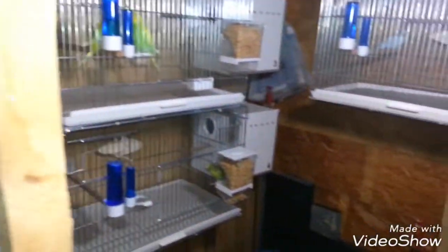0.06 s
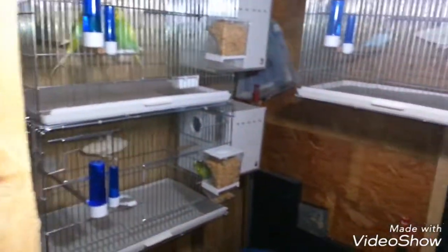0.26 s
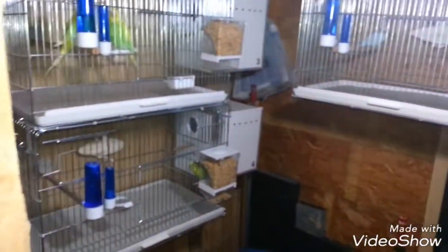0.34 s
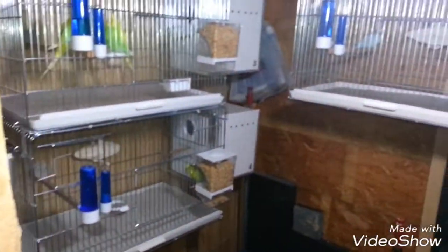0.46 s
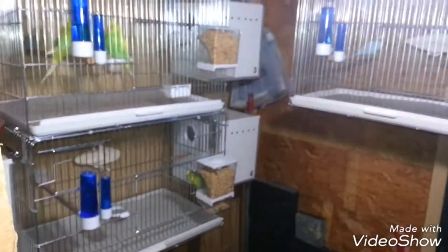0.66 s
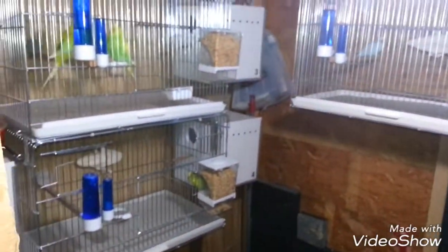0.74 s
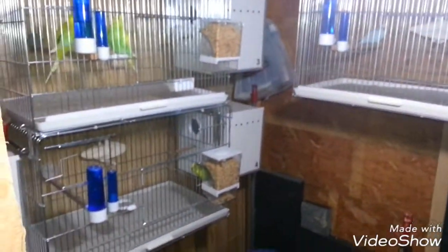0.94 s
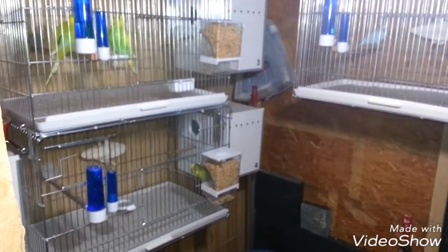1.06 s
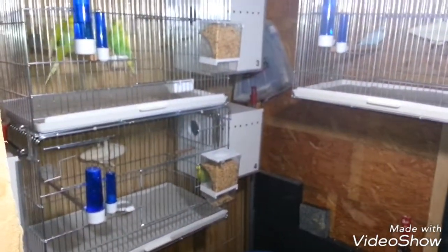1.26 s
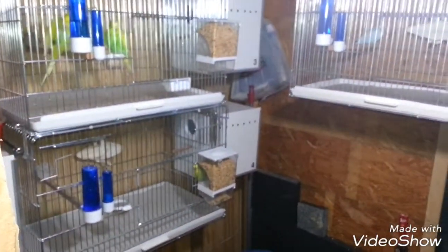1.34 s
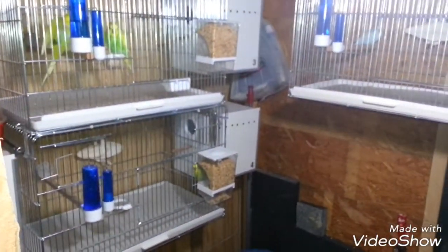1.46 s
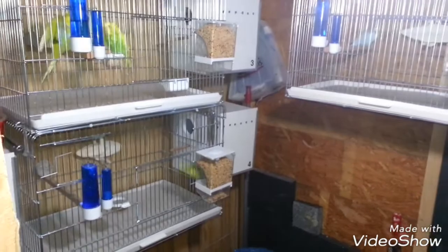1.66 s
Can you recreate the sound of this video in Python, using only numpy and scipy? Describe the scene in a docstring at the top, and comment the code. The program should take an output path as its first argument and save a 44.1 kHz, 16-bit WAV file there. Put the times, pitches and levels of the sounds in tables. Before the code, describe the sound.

Budgerigars chatter in cages in a small wood-lined room, over low rumble and faint hiss. A tiny cage tick at 0.08 seconds leads to quick sliding chirps from 0.15, a short rasp near 0.23 and soft wing flutter. A loud, harsh two-part squawk bursts at 0.31-0.41. Light ticks follow around 0.55, then near quiet until a second rapid whistled warble at 1.03-1.2, fading to room tone.

```python
"""A low room rumble under faint hiss, then a beak or claw tick and a quick warble of caged budgerigars.
The warble's sliding whistled notes mix with a short rasp and break into a loud, harsh two-part squawk,
with a soft flutter of wings; more cage ticks and a second warble follow. Notes are swept tones, squawks
jittering tones with pulsed noise, wings puffs of noise, ticks ringing cage modes; all but the rumble and
hiss pass through a small wood-lined room."""
import sys
import numpy as np
from scipy import signal
from scipy.fft import rfft, irfft, next_fast_len
from scipy.io import wavfile
from scipy.ndimage import map_coordinates

SR = 44100
rng = np.random.default_rng(int(sys.argv[2]) if len(sys.argv) > 2 else 0)


def pcm_store(signal):
    """Save signal as 16-bit PCM."""
    levels = np.round(np.clip(np.atleast_2d(signal), -1, 1) * 32767)
    wavfile.write(sys.argv[1], SR, levels.astype(np.int16).T)


N = 74970
T = np.arange(N) / SR  # time in s


def amp(db):
    """Decibels to gain."""
    return 10 ** (np.asarray(db) / 20)


def unit(x):
    """Scale to rms 1."""
    return x / np.sqrt(np.mean(x ** 2) + 1e-20)


def along(points, hz):
    """Read (Hz, value) points on a log frequency axis."""
    point_hz, values = np.transpose(points)
    return np.interp(np.log(hz + 1), np.log(point_hz + 1), values)


def wobble(rate):
    """A smooth random curve, rate knots a second."""
    knots = rng.standard_normal(N // 8)
    return map_coordinates(knots, [T * rate], mode="wrap")


def filtered(x, response):
    """Apply a response of frequency, padded so that the end does not wrap onto the start."""
    size = next_fast_len(N + SR // 2)
    spectrum = rfft(x, size) * response(np.fft.rfftfreq(size, 1 / SR))
    return irfft(spectrum, size)[..., :N]


def coloured(x, points):
    """Shape x with an equaliser curve of (Hz, dB) points, at rms 1."""
    return unit(filtered(x, lambda hz: amp(along(points, hz))))


def envelope(start, length, attack, release):
    """Smooth attack, hold, smooth release."""
    rise = np.clip((T - start) / attack, 0, 1)
    fall = np.clip((start + length - T) / release, 0, 1)
    return np.sin(np.pi / 2 * rise * fall) ** 2


def pan(db):
    """Left and right gains from the left minus right level."""
    return amp(np.array([[db], [-db]]) / 2)


def room(x, direct_db, lag_s=0):
    """Direct sound, near wall reflections and a short decaying tail, different at each ear."""
    # Reverb decay: pitch_hz, t60_s
    decay_times = [(300, 0.67), (1600, 0.2), (2600, 0.19), (5000, 0.16), (12000, 0.15)]
    first_wall_s, last_wall_s, walls_db, tail_db = 0.0018, 0.014, -5, 1.5
    hz, t, noise = signal.stft(rng.standard_normal((2, SR // 3)), SR, nperseg=256)
    decay = amp(-60 * t / along(decay_times, hz)[:, None])
    tail = signal.istft(noise * decay, SR, nperseg=256)[1]
    tail = tail * (np.arange(tail.shape[1]) > first_wall_s * SR)
    answer = amp(tail_db) * tail / np.linalg.norm(tail[0])
    for ear in answer:
        delays = rng.uniform(first_wall_s, last_wall_s, size=8)
        ear[(delays * SR).astype(int)] += amp(walls_db) / np.sqrt(len(delays))
    # A positive lag makes the direct sound reach the left ear later
    for ear, lag in zip(answer, (lag_s, -lag_s)):
        ear[round(max(lag, 0) * SR)] += amp(direct_db)
    return signal.fftconvolve(x[None], answer, axes=1)[:, :N]


def background():
    """Steady noise: a rumble much alike on both sides, under a faint wide hiss."""
    # Spectrum of rumble and hiss: pitch_hz, relative level_db
    floor_colour = [(25, -30.5), (60, -19.5), (108, -13.5), (175, -3.5), (270, -4), (360, -7), (520, -8),
                    (720, -8), (1300, -14), (1900, -18), (4500, -22.5), (6200, -33.5), (8500, -27),
                    (13000, -26.5), (14800, -31.5)]
    # Left-right likeness: pitch_hz, correlation (0-1)
    floor_alike = [(50, .3), (150, 0.8), (500, 0.54), (1500, 0.074), (8000, 0.033)]
    floor_db, floor_pan_db = -50, -2

    def mid_side_gains(hz):
        """Split the power between mid and side to set the left-right correlation."""
        turn = np.arccos(np.clip(along(floor_alike, hz), -1, 1)) / 2
        return np.array([np.cos(turn), np.sin(turn)])

    mid, side = filtered(rng.standard_normal((2, N)), mid_side_gains)
    stereo = np.array([mid + side, mid - side])
    return amp(floor_db) * pan(floor_pan_db) * coloured(stereo, floor_colour)


def ticks():
    """Beaks and claws: tiny hard contacts ring the cage's decaying modes for an instant."""
    # Contacts: start_s, level_db before modes and room
    contacts = [(0.0844, -42), (0.5354, -42.5), (0.5571, -50.5)]
    # Cage resonances: pitch_hz, relative level_db, t60_s
    cage_modes = [(2460, -2, .012), (2580, -2, 0.007), (4000, -6.5, .011), (5050, -10, 0.0058),
                  (6950, -7, 0.0045)]
    out = np.zeros(N)
    for start, db in contacts:
        age = np.maximum(T - start, 0)
        for hz, mode_db, t60 in cage_modes:
            ring = np.sin(2 * np.pi * hz * age)
            out += amp(db + mode_db - 60 * age / t60) * ring
    return room(out, direct_db=2)


def puffs(events, width, colour):
    """Soft bell-shaped swells of coloured noise."""
    level = sum(amp(db) * np.exp(-((T - centre) / width) ** 2) for centre, db in events)
    return level * coloured(rng.standard_normal(N), colour)


def wings():
    """Each wingbeat pushes a soft low puff of air, and brushing feathers add brighter noise."""
    # Wingbeats: centre_s, level_db before room and pan
    wingbeats = [(0.237, -44.5), (.288, -52), (.345, -45), (.382, -50), (.425, -52.5)]
    # Spectrum of the air puffs: pitch_hz, relative level_db
    wing_colour = [(90, -47), (165, -2), (260, 0.5), (400, 0.5), (600, 5), (800, -11.5), (1500, -27.5)]
    # Feathers brushing: centre_s, level_db before room and pan
    rustles = [(.232, -43.5), (.322, -43)]
    # Spectrum of the feathers: pitch_hz, relative level_db
    feathers = [(700, -30), (1600, -4.5), (4000, 0), (9000, -9), (14000, -22)]
    beat_width_s, rustle_width_s = 0.015, 0.028
    beating = puffs(wingbeats, beat_width_s, wing_colour)
    brushing = puffs(rustles, rustle_width_s, feathers)
    return room(beating + brushing, direct_db=1.5) * pan(-2)


def syrinx(pitch, partials):
    """The bird's voice organ: a tone with overtones that follows a pitch curve, at rms 1."""
    phase = 2 * np.pi * np.cumsum(pitch) / SR
    return unit(sum(amp(db) * np.sin(round(multiple) * phase) for multiple, db in partials))


def warble():
    """Nearly pure notes, each a quick, slightly unsteady slide with faint turbulent air."""
    # Whistled notes: start_s, length_s, start_pitch_hz, end_pitch_hz, level_db before trim, room and pan,
    # pitch unsteadiness (share of pitch), octave overtone level_db relative to the fundamental
    notes = [(0.146, 0.026, 3480, 3900, -45.5, 0.099, -16), (0.155, 0.018, 2874, 2517, -42, .06, -44),
             (0.185, 0.0096, 2007, 1490, -41, 0.093, -47), (0.201, .025, 2912, 2310, -38, 0.0275, -40),
             (0.263, 0.0221, 2787, 2815, -33, 0.011, -30), (0.295, 0.0123, 2980, 2926, -27, 0.0052, -49),
             (0.312, 0.0122, 2860, 2804, -29, 0.014, -33), (1.029, 0.0086, 3670, 3190, -38.5, 0.0065, -26),
             (1.039, 0.028, 2790, 2180, -40, .025, -27), (1.064, 0.0128, 1980, 1715, -37, 0.0227, -38),
             (1.081, 0.019, 2845, 2570, -34, 0.036, -26.5), (1.103, 0.021, 2728, 2362, -26, .02, -52),
             (1.12, 0.013, 3485, 3387, -29, 0.039, -42), (1.145, 0.011, 3450, 2900, -29.5, .03, -29),
             (1.157, 0.0208, 3160, 2662, -34, .03, -20.5), (1.182, 0.015, 2712, 2600, -27.5, 0.024, -32),
             (1.179, .010, 2375, 1390, -29.5, .03, -36), (1.349, .025, 3103, 2900, -63, 0.033, -37),
             (1.393, 0.0277, 3190, 2854, -62, .03, -38)]
    # Spectrum of the turbulent air: pitch_hz, relative level_db
    air_colour = [(1000, -14), (2500, 10), (4200, -2), (5400, -7), (7000, -13.5), (13000, -15)]
    fade_s, waver_hz = 0.0033, 597  # fade at each end; speed of the unsteadiness
    air_db, trim_db, pan_db = -21, 0.5, -4
    out = np.zeros((2, N))
    air = amp(air_db) * coloured(rng.standard_normal(N), air_colour)
    for start, length, from_hz, to_hz, db, waver, octave_db in notes:
        slide = np.interp(T, [start, start + length], [from_hz, to_hz])
        pitch = slide * (1 + waver * wobble(waver_hz))
        voice = syrinx(pitch, [(1, 0), (2, octave_db)]) + air
        note = amp(db) * envelope(start, length, fade_s, fade_s) * voice
        out += room(note, direct_db=-2, lag_s=0.00035)
    return amp(trim_db) * out * pan(pan_db)


def squawks():
    """The voice driven into chaos: a jittering tone and turbulence, pulsing unevenly through the throat."""
    # Harsh calls: start_s, length_s, attack_s, start_pitch_hz, end_pitch_hz, level_db before room and pan,
    # roughness (0-1), brightness tilt (dB per octave), left minus right pan_db before the stereo lean
    calls = [(0.219, .049, 0.025, 3700, 3000, -28.5, 0.72, -3, -0.5),
             (0.2291, 0.0045, 0.0002, 3400, 3200, -20.5, 0.75, -2.5, 7.5),
             (.314, .065, 0.027, 2778, 3080, -17.5, 0.88, .5, 0),
             (.381, 0.032, 0.0033, 2862, 2480, -16.5, 0.39, -2, -1)]
    # Overtones of the tone: multiple of the pitch, relative level_db
    harsh_partials = [(1, -10), (2, 2.5), (3, 1), (4, 4.5)]
    # Throat and beak spectrum: pitch_hz, relative level_db before each call's tilt
    throat = [(700, -62), (1050, -35), (1500, -19), (2000, -11.5), (2500, -1.5), (3000, 0.5), (3600, -1),
              (4300, 0), (4700, -2), (5450, -1), (6300, -3.5), (7100, -12), (8400, -8), (10000, -22),
              (12700, -18), (14500, -39)]
    # Stereo lean: pitch_hz, left minus right level_db
    stereo_lean = [(1200, -4.5), (2500, -3), (4300, 0.5), (7500, 0), (13000, 1.5)]
    release_s = 0.0019
    jitter, jitter_hz = 0.03, 1507  # chaotic pitch swings (share of pitch) and their speed
    rasp_hz, rasp_scatter, rasp_db = 391.7, 0.4543, 6.5  # pulse rate, its unevenness (share), swing each way
    shudder_db, shudder_hz = 1, 168.4  # slower random unevenness of strength
    out = np.zeros((2, N))
    for start, length, attack, from_hz, to_hz, db, rough, tilt_db, pan_db in calls:
        slide = np.interp(T, [start, start + length], [from_hz, to_hz])
        pitch = slide * (1 + jitter * wobble(jitter_hz))
        tone = np.sqrt(1 - rough) * syrinx(pitch, harsh_partials)
        turbulence = np.sqrt(2 * rough) * rng.standard_normal(N)
        cycles = np.cumsum(rasp_hz * (1 + rasp_scatter * wobble(rasp_hz))) / SR
        rasp = rasp_db * np.sin(2 * np.pi * cycles)
        pulsing = amp(rasp + shudder_db * wobble(shudder_hz))
        tilted_throat = [(hz, level + tilt_db * np.log2(hz)) for hz, level in throat]
        voice = coloured((tone + turbulence) * pulsing, tilted_throat)
        call = amp(db) * envelope(start, length, attack, release_s) * voice
        out += room(call, direct_db=-5, lag_s=-0.0004) * pan(pan_db)
    return filtered(out, lambda hz: amp(np.outer([0.5, -0.5], along(stereo_lean, hz))))


def scene():
    """All the birds and their room."""
    return background() + ticks() + wings() + warble() + squawks()


def record(dry):
    """Cut everything from the band limit upward."""
    top_hz = 14850
    return filtered(dry, lambda hz: hz < top_hz)


dry = scene()
out = record(dry)
pcm_store(out)
```